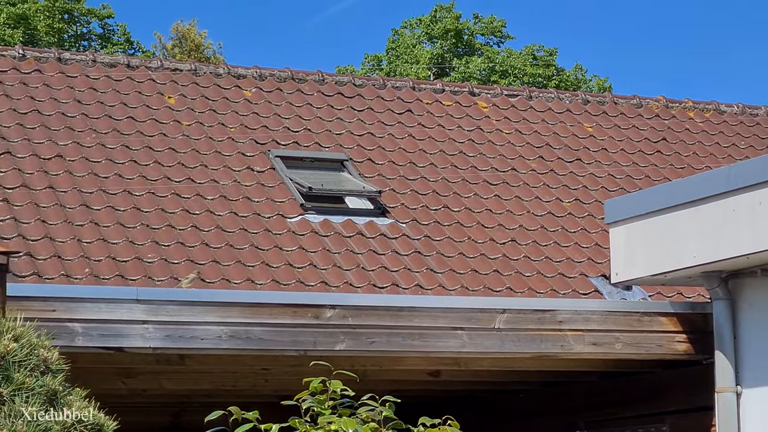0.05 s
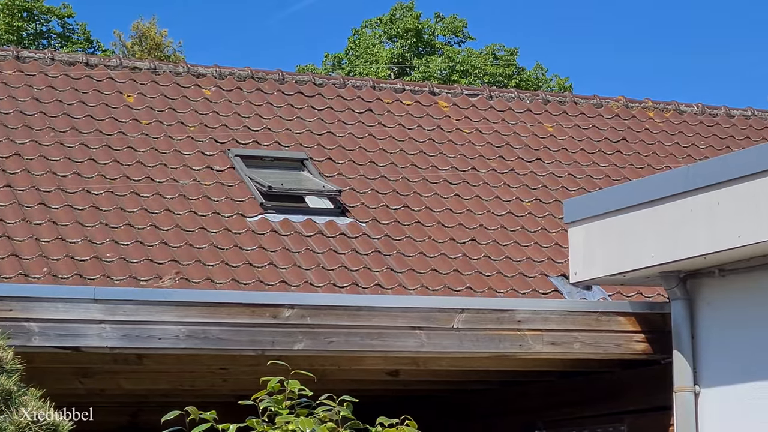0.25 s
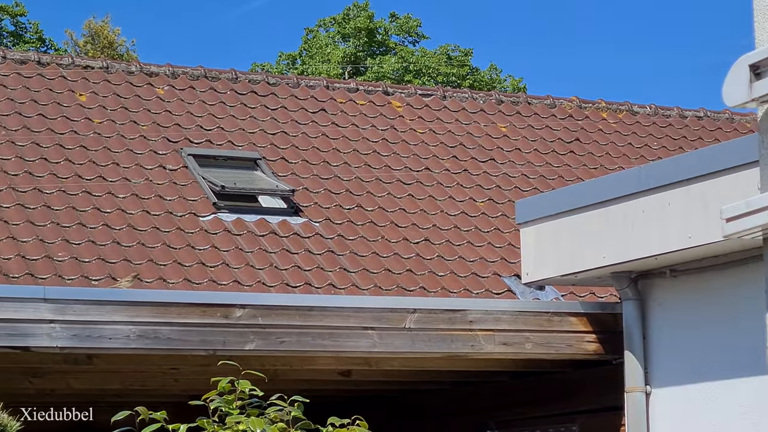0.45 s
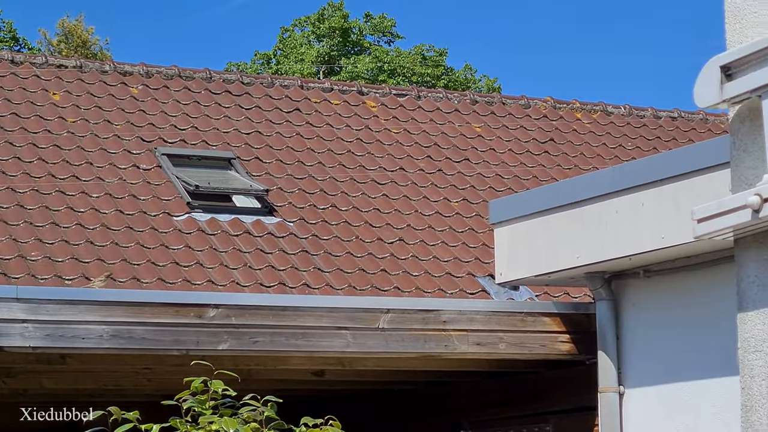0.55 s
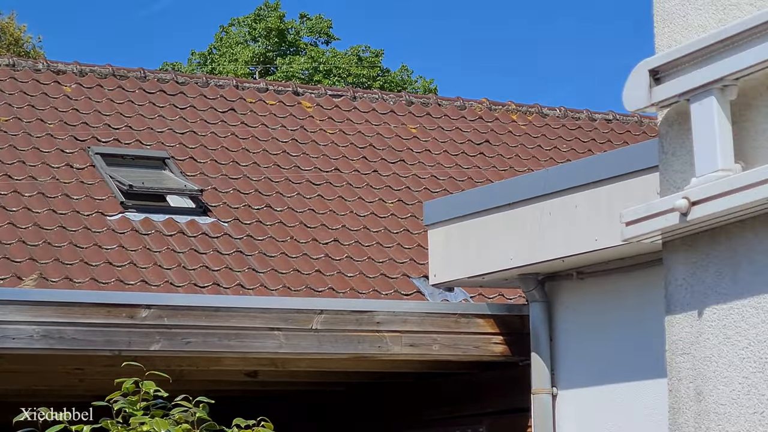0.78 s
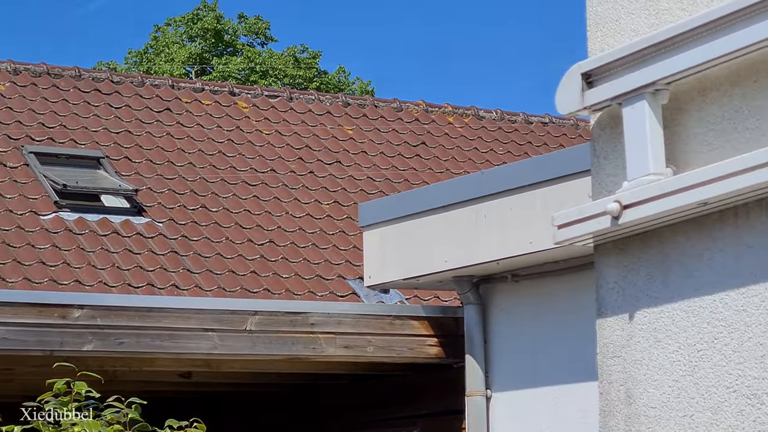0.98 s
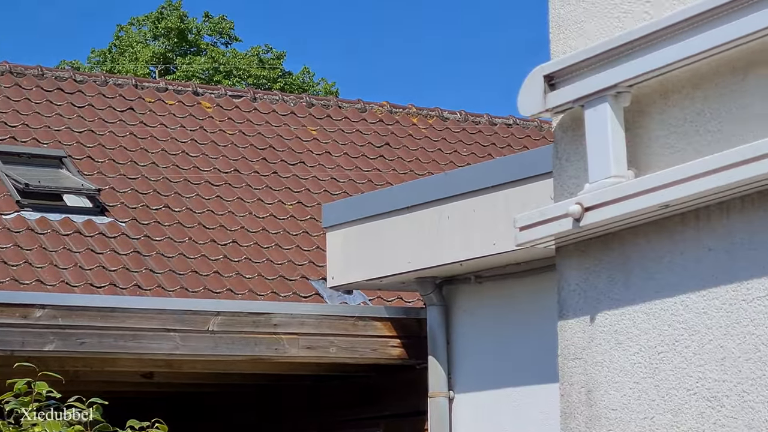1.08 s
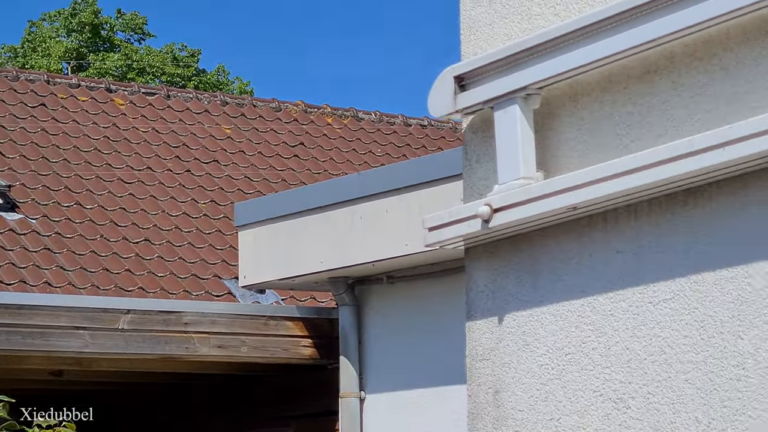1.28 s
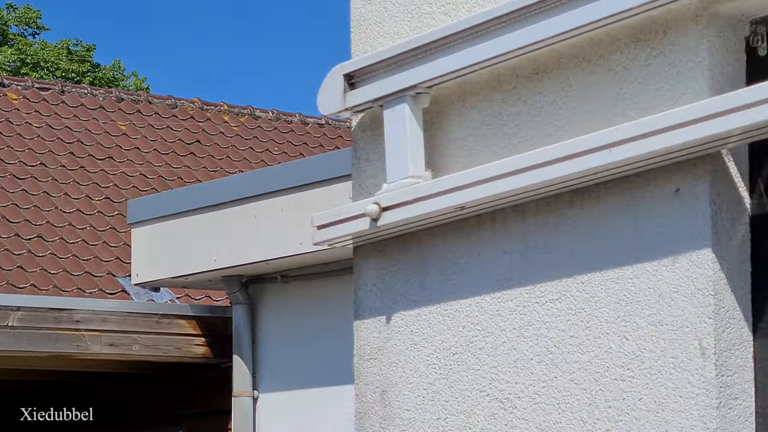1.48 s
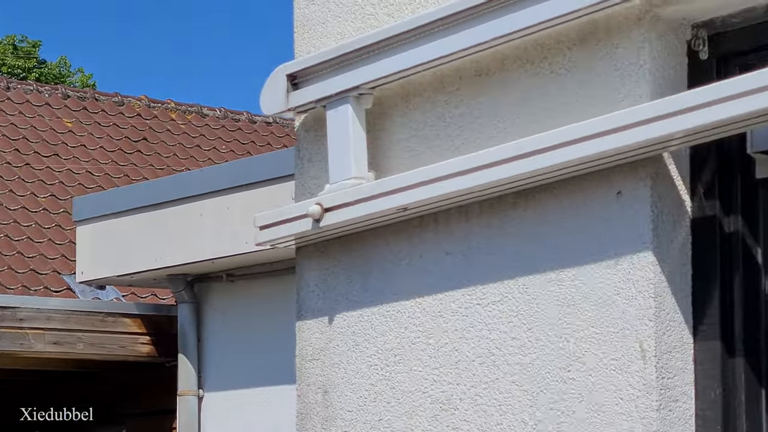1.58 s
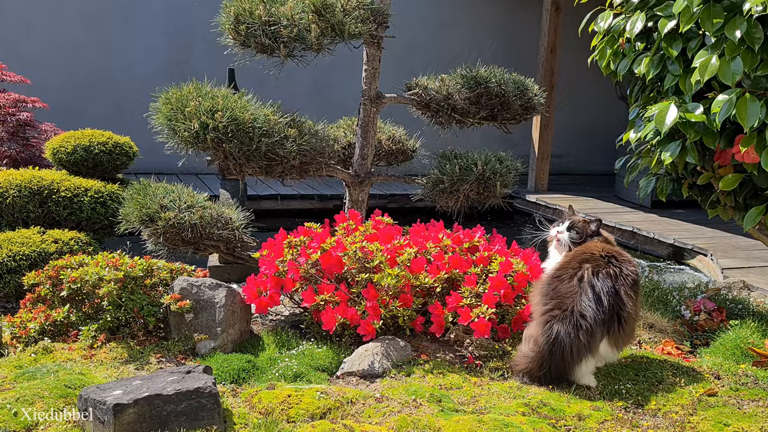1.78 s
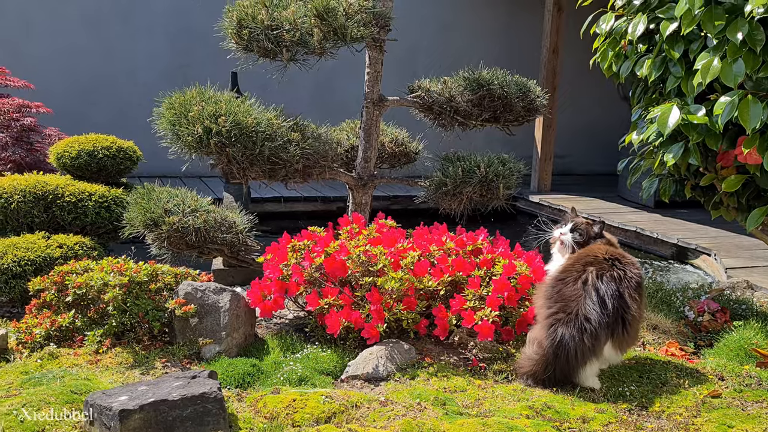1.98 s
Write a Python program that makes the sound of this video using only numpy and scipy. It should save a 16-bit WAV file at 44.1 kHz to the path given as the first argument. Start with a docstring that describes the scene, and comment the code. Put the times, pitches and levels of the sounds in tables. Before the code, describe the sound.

Wind buffets the microphone in a garden with a low, lumpy rumble, strongest around 0.3 to 0.4 seconds and gusting again near 0.7, 1.5 and 1.75. Distant songbirds chirp faintly throughout, over a soft leaf hush and far town drone. At about 1.8 seconds a crackling click cuts the wind off. After an instant of silence, calm, quiet air follows with a few faint chirps around 2 seconds.

```python
"""Wind gusts buffet the two microphone ports with a low, lumpy rumble in a breezy garden.
Distant songbirds twitter in short gliding whistles, and house walls answer them,
over a faint hush of leaves and the drone of a far town. A crackling click and a moment
of silence lead to a calmer spot, where the birds go on."""
import sys
import numpy as np
from scipy import signal
from scipy.fft import rfft, irfft, next_fast_len
from scipy.io import wavfile
from scipy.ndimage import uniform_filter1d, map_coordinates

SR = 44100
rng = np.random.default_rng(int(sys.argv[2]) if len(sys.argv) > 2 else 0)


def transcribe(u):
    """Save the signal u as a 16-bit wav file named by the first command-line argument.

    u: samples, shape (n,) or (channels, n), limited to [-1, 1]; the rate is SR.
    q: integer samples, one column per channel.
    """
    v = np.clip(np.atleast_2d(u).T, -1, 1)
    q = np.round(v * 32767).astype(np.int16)
    wavfile.write(sys.argv[1], SR, q)


N = 90404
TIME = np.arange(N) / SR
BREAK_S, SILENT_S, CALM_S = 1.8197, 1.8375, 1.8793  # the wind cuts off, silence, the calm spot opens


def amp(db):
    """Decibels to gain."""
    return 10 ** (np.asarray(db) / 20)


def unit(x):
    """Scale to rms 1."""
    return x / np.sqrt(np.mean(x ** 2) + 1e-20)


def along(points, hz):
    """Read (frequency [Hz], value) points on a log frequency axis."""
    freqs, values = np.transpose(points)
    return np.interp(np.log(hz + 1), np.log(freqs + 1), values)


def curves(rows):
    """An automation curve for each column after the time."""
    times, *columns = np.transpose(rows)
    return [np.interp(TIME, times, column) for column in columns]


def wobble(rate):
    """A smooth random curve, rate knots a second."""
    return map_coordinates(rng.standard_normal(N // 4), [TIME * rate], mode="wrap")


def filtered(x, response):
    """Equalise x with a gain given as a function of frequency."""
    size = next_fast_len(N + SR // 2)
    return irfft(rfft(x, size) * response(np.fft.rfftfreq(size, 1 / SR)), size)[..., :N]


def pan(side_db):
    """Constant-power left and right gains for a left minus right level."""
    gains = amp(np.array([side_db, -side_db]).reshape(2, -1) / 2)
    return gains / np.sqrt(np.mean(gains ** 2, axis=0))


def noise(spectrum):
    """Coloured noise of rms 1, unrelated at the two ports."""
    return unit(filtered(rng.standard_normal((2, N)), lambda hz: amp(along(spectrum, hz))))


def turbulence(spectrum, port_leak=0.14, even_s=0.031, waver_db=0.1):
    """Pressure swings, evened out in level; a share of each eddy reaches the other port."""
    flow = noise(spectrum)
    flow = flow + port_leak * flow[::-1]
    power = uniform_filter1d(np.abs(signal.hilbert(flow)) ** 2, size=int(even_s * SR) + 1)
    waver = amp(-waver_db * np.array([wobble(41.5), wobble(40)]))
    return unit(flow / np.sqrt(np.abs(power) + 1e-9) * waver)


def wind(trim_db=0.5, low_cut_hz=22.1):
    """Gusts strike one port more than the other; smaller eddies rumble higher than the deep buffet."""
    # deep buffeting (time [s], level [dB], left minus right [dB])
    gusts = [(0.0, -47.5, 11), (0.024, -48, 13), (0.054, -62.5, 9), (0.162, -62.5, 11.5),
             (0.216, -39.5, 0.5), (0.246, -47, 2), (0.276, -28.5, 5.5), (0.348, -41.5, -3),
             (0.378, -41, 1.5), (0.408, -41, 7), (0.432, -34.5, 14), (0.51, -47.5, 9), (0.528, -58.5, 10),
             (0.63, -47, 4.5), (0.69, -36.0, -4), (0.714, -36, 12), (0.738, -54.5, -14), (0.774, -36, -11),
             (0.804, -55.5, -7), (0.828, -40, -8), (0.906, -55.5, -10), (0.978, -43, -7.5),
             (1.062, -48.5, 14), (1.092, -60.0, 18), (1.194, -70, 7), (1.236, -51, 24), (1.278, -57, 6.5),
             (1.326, -42.5, 16), (1.35, -57.5, 28), (1.41, -58, 13), (1.434, -43.5, 5), (1.536, -43.5, 4.5),
             (1.572, -48.5, 1.5), (1.638, -43.5, 13), (1.764, -36, 0), (1.812, -46, 16)]
    # middle and upper rumble (time [s], level before trim [dB])
    swirls = [(0.0, -65.5), (0.06, -76), (0.276, -39), (0.402, -44.0), (0.564, -73.5), (0.606, -46.5),
              (0.72, -54.5), (0.774, -52), (0.912, -58.5), (1.014, -59.5), (1.068, -65), (1.14, -59),
              (1.206, -70), (1.248, -55.5), (1.338, -65), (1.5, -40), (1.554, -62.5), (1.752, -43),
              (1.812, -53.5)]
    eddies = [(0.0, -61.5), (0.06, -78), (0.168, -72.5), (0.348, -42.5), (0.444, -58), (0.522, -76.5),
              (0.648, -60), (0.756, -78.5), (0.906, -77.5), (1.008, -64.5), (1.158, -70), (1.194, -83),
              (1.266, -72), (1.374, -69), (1.512, -51.5), (1.536, -70.5), (1.812, -53)]
    # tone of the three bands (frequency [Hz], level [dB])
    buffet_eq = [(16, -36), (28, -21), (45, -3), (63, 1), (82, -10), (105, -21.5), (180, -71.5),
                 (500, -120)]
    swirl_eq = [(50, -24), (85, -10), (104, 5), (128, -10), (152, -23), (300, -77), (800, -120)]
    eddy_eq = [(70, -26), (135, -13), (176, 4.5), (225, -4.5), (275, -22), (420, -36.5), (3000, -120)]
    gust_db, side_db = curves(gusts)
    buffet = amp(gust_db) * turbulence(buffet_eq)
    swirl = amp(curves(swirls)[0] + trim_db) * turbulence(swirl_eq)
    eddy = amp(curves(eddies)[0] + trim_db) * turbulence(eddy_eq)
    pressure = pan(side_db) * (buffet + swirl + eddy)
    # the microphone ignores the slowest pressure swings
    return filtered(pressure, lambda hz: 1 - 1 / (1 + (hz / low_cut_hz) ** 4))


def hush(spectrum, patchy_db=2.76):
    """Faint leaves and distance, in soft patches, partly alike at the two ports."""
    # stereo width (frequency [Hz], left-right correlation [ratio])
    likeness = [(300, 0.59), (550, 0.57), (1000, 0), (3000, 0.01), (6000, 0.015), (7500, 0.092),
                (15000, 0.7)]
    # stereo balance (frequency [Hz], left minus right [dB])
    balance = [(300, 1), (1000, -0.5), (2200, -4.5), (5000, -1.5), (9000, 3), (15000, 4)]
    bands = signal.stft(noise(spectrum), nperseg=512)[2]
    patches = uniform_filter1d(rng.standard_normal(bands.shape[1:]), size=8, axis=0)  # across pitch
    patches = unit(uniform_filter1d(patches, size=12, axis=1))  # across time
    rustle = signal.istft(bands * amp(patchy_db * patches), nperseg=512)[1][:, :N]
    width = lambda hz: np.arccos(along(likeness, hz)) / 2
    mid, side = filtered(rustle, lambda hz: np.array([np.cos(width(hz)), np.sin(width(hz))]))
    return unit(filtered(np.array([mid + side, mid - side]), lambda hz: pan(along(balance, hz))))


def breeze(level_db=-69, crossover_hz=1020):
    """The garden's hush, whose low part sinks in the lull between gusts."""
    # tone of the hush (frequency [Hz], level [dB])
    leaves_eq = [(180, -25), (300, -4.5), (535, -9.5), (630, -10), (920, -12), (1150, -10.5), (1730, -12),
                 (2250, -16.5), (2900, -18), (3900, -24), (6400, -25.5), (7100, -35), (9000, -38.5),
                 (11000, -41.5), (15500, -41)]
    # swell of its low part (time [s], gain [dB])
    swell = [(0, -2), (.33, 0.5), (.75, -2.5), (1.15, -4.5), (1.55, 0.5), (1.83, -1)]
    leaves = amp(level_db) * hush(leaves_eq)
    low = filtered(leaves, lambda hz: 1 / (1 + (hz / crossover_hz) ** 4))
    return leaves - low + low * amp(curves(swell)[0])


def far_town(level_db=-68.5):
    """The steady low drone of a distant town."""
    # tone of the drone (frequency [Hz], level [dB])
    town_eq = [(20, -27.5), (60, 6), (110, 6.5), (165, -32.5), (235, 1.5), (330, -12.5), (480, -10.5),
               (900, -45.5)]
    return amp(level_db) * noise(town_eq)


def garden_reverb(x):
    """Diffuse stereo echo of a mono sound; each frequency dies at its own speed."""
    # decay of the garden (frequency [Hz], time to fall 60 dB [s])
    decays = [(800, .42), (2500, 0.44), (6000, 0.38), (12000, 0.37)]
    hz, t, bands = signal.stft(rng.standard_normal((2, SR // 2)), SR, nperseg=256)
    tail = signal.istft(bands * amp(-60 * t / along(decays, hz)[:, None]), SR, nperseg=256)[1]
    return signal.fftconvolve(x[None], tail / np.linalg.norm(tail[0]), axes=1)[:, :N]


def songbirds(rasp_rate_hz=900, right_lag_s=0.00048, direct_db=-0.5, reverb_db=-2.5):
    """Short gliding whistles, rasped by a fast pitch flutter, each answered by the walls."""
    # bird notes (time [s], length [s], first pitch [Hz], last pitch [Hz], level [dB],
    # rasp [share of pitch], left minus right [dB])
    notes = [ (0.062, 0.036, 1127, 1168, -64.5, 0.034, 11), (.358, 0.036, 9400, 11500, -81.5, 0.25, -1),
             (.375, 0.017, 3400, 3360, -69, 0.025, 4.5), (0.483, 0.067, 830, 789, -59.5, 0.14, 0),
             (.45, .11, 2160, 1880, -71, 0.14, -6.5), (0.613, 0.027, 3304, 3250, -65, 0.044, -2),
             (0.649, 0.031, 3500, 3570, -70.5, 0.065, -3), (.675, 0.027, 5320, 5650, -65.5, 0.067, -1.5),
             (0.663, 0.052, 6980, 7200, -74, 0.087, 4), (.676, 0.028, 11300, 12000, -80, 0.12, 1),
             (.705, 0.031, 5790, 6400, -76, 0.066, -11), (0.711, .08, 7890, 9160, -78.5, .2, 0),
             (0.713, 0.0463, 1986, 1857, -68, 0.158, -7), (0.786, .03, 3366, 3465, -71, .08, 1),
             (.792, 0.015, 1850, 1824, -61.5, 0.011, -4), (0.802, 0.023, 1612, 1607, -51, 0.019, -2),
             (0.819, 0.015, 2200, 2190, -54.5, 0.082, -5), (0.843, 0.067, 1823, 1800, -59.5, 0.16, -2.5),
             (0.945, 0.079, 2400, 2237, -61.5, 0.043, -10), (0.984, .032, 2800, 2784, -51, 0.087, -4),
             (1.22, 0.017, 4900, 5000, -70.5, 0.066, -7), (1.238, 0.016, 3080, 2860, -60.5, 0.08, -8.5),
             (1.264, 0.033, 2508, 2660, -60.5, 0.18, -5), (1.287, 0.047, 3440, 3620, -68.5, 0.066, 2),
             (1.443, 0.046, 3984, 4260, -67.5, 0.092, 2), (1.489, 0.038, 2116, 2224, -67.5, 0.063, -4),
             (1.507, 0.021, 1376, 1407, -58, 0.13, 0), (1.516, 0.025, 2840, 2845, -55, 0.0728, -3.5),
             (1.924, 0.044, 4420, 4650, -77.5, .09, 1), (1.992, 0.045, 2790, 2305, -64, 0.23, -6.5),
             (2.002, 0.02, 4280, 4110, -70, 0.12, -6), ]
    # slapback from house walls (delay [s], level [dB])
    walls = [(.024, -12), (0.067, -20)]
    delayed = lambda x, delay_s: np.pad(x, (int(delay_s * SR), 0))[:N]
    song = np.zeros((2, N))
    for start, length, first_hz, last_hz, db, rasp, side_db in notes:
        progress = np.clip((TIME - start) / length, 0, 1)
        glide_hz = first_hz + (last_hz - first_hz) * progress
        pitch_hz = glide_hz * (1 + rasp * wobble(rasp_rate_hz))
        envelope = amp(db) * np.sqrt(2) * np.sin(np.pi * progress) ** 2
        note = envelope * np.sin(2 * np.pi * np.cumsum(pitch_hz) / SR)
        slapback = sum(amp(wall_db) * delayed(note, delay_s) for delay_s, wall_db in walls)
        early = amp(direct_db) * note + slapback
        ports = np.array([early, delayed(early, right_lag_s)])
        song += pan(side_db) * (ports + amp(reverb_db) * garden_reverb(note))
    return song


def clicks():
    """Dry ticks on either side of the silence: noise bursts that die within milliseconds."""
    # ticks (time [s], starting level [dB], time to fall 60 dB [s], left minus right [dB])
    ticks = [(1.8195, -59, 0.0013, -5), (1.825, -38, 0.0018, 15), (1.837, -59, 0.0052, -7),
             (1.894, -71, 0.0025, 0), (1.897, -57.5, 0.0013, 4)]
    # their tone (frequency [Hz], level [dB])
    tick_eq = [(300, 3), (2500, -31), (7000, -4), (10000, -16), (16000, -17)]
    envelope = np.zeros((2, N))
    for start, db, decay_s, side_db in ticks:
        fall_db = 60 * np.abs(TIME - start) / decay_s
        envelope += pan(side_db) * (TIME >= start) * amp(db - fall_db)
    return envelope * noise(tick_eq)


def crackle(level_db=-53.5):
    """A brief, bass-heavy burst of noise between the wind and the silence."""
    # tone of the burst (frequency [Hz], level [dB])
    crackle_eq = [(30, 11), (70, 23.5), (200, -4), (800, -10.5), (1500, 1.5), (2300, -13), (4000, -12.5),
                  (15000, -37)]
    return amp(level_db) * noise(crackle_eq) * (TIME >= BREAK_S) * (TIME < SILENT_S)


def calm_spot(hush_db=-73, drone_db=-67.5, hiss_db=-83, hiss_fall_db_per_s=86, fade_in_s=0.053):
    """A sheltered place: a soft drone, a hush that opens up and a hiss that fades."""
    # tone of the three layers (frequency [Hz], level [dB])
    hiss_eq = [(3000, -20), (6000, 21), (9000, 0), (15000, 4)]
    hush_eq = [(180, -30), (300, -4), (907, -10), (1030, -3.5), (2400, -4), (3450, -8), (4420, -18.5),
               (5130, -20.5), (15500, -46)]
    drone_eq = [(20, -12), (45, -9.5), (65, 4), (105, -2), (150, -16), (240, -17), (600, -49)]
    elapsed = np.clip(TIME - CALM_S, 0, None)
    fade_in = np.sqrt(np.clip(elapsed / fade_in_s, 0, 1))
    hiss = amp(hiss_db - hiss_fall_db_per_s * elapsed) * noise(hiss_eq)
    air = amp(hush_db) * hush(hush_eq) + hiss
    return air * fade_in + amp(drone_db) * noise(drone_eq)


def scene():
    """The windy spot, a crackle, silence, then the calm spot; birds sing in both places."""
    song = songbirds()
    windy = (wind() + breeze() + far_town() + song) * (TIME < BREAK_S)
    cut = crackle() + clicks()
    calm = (calm_spot() + song) * (TIME >= CALM_S)
    return windy + cut + calm


def record(dry, top_hz=15800):
    """A brick-wall low-pass takes off the highest treble."""
    return filtered(dry, lambda hz: hz < top_hz)


dry = scene()
out = record(dry)
transcribe(out)
```